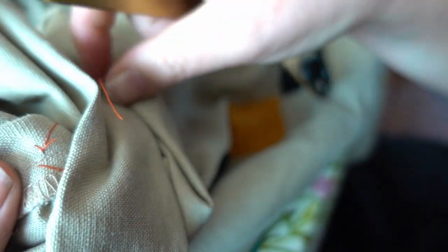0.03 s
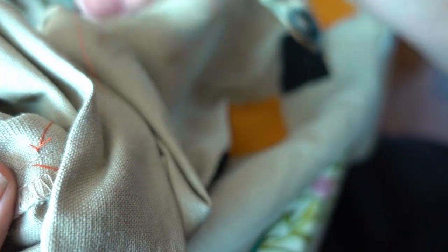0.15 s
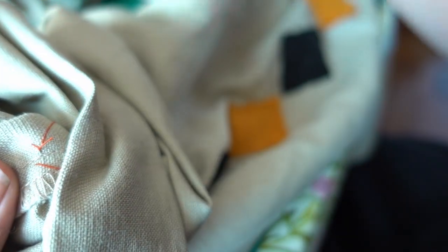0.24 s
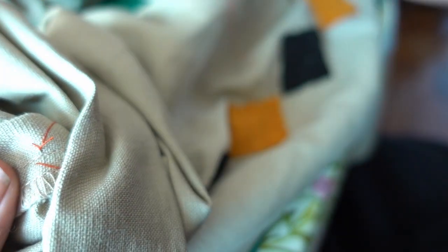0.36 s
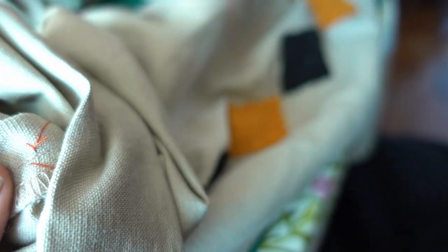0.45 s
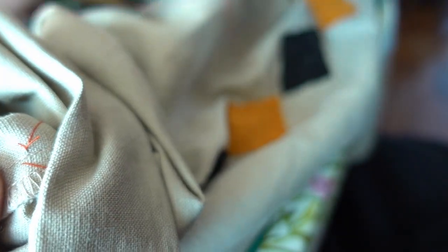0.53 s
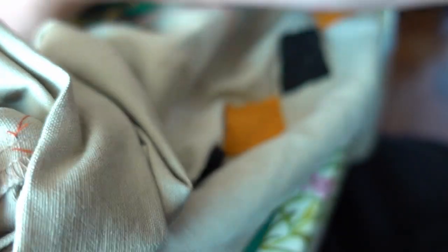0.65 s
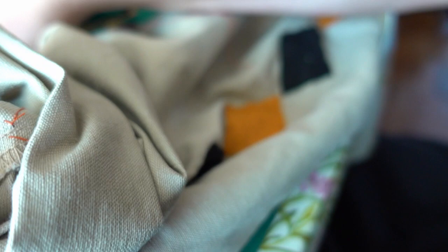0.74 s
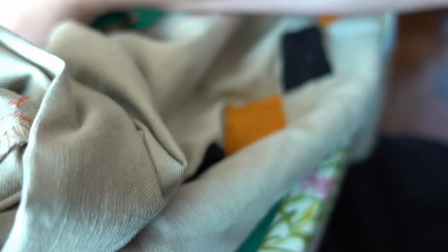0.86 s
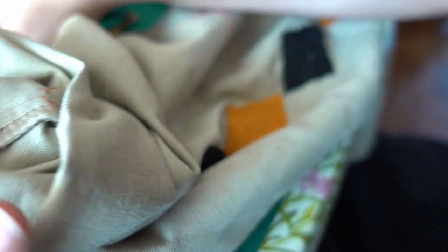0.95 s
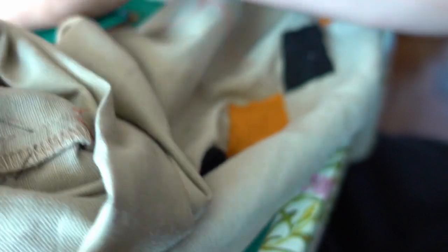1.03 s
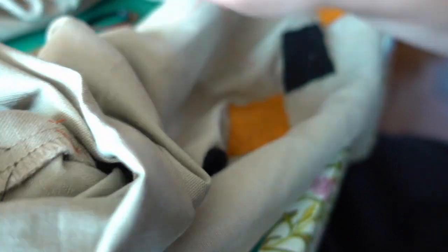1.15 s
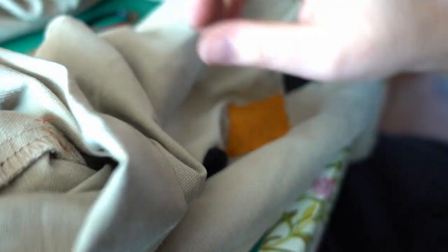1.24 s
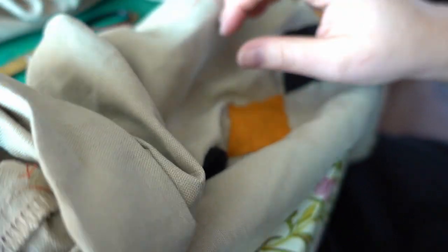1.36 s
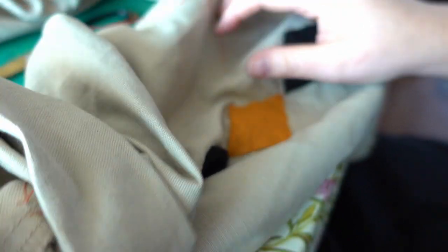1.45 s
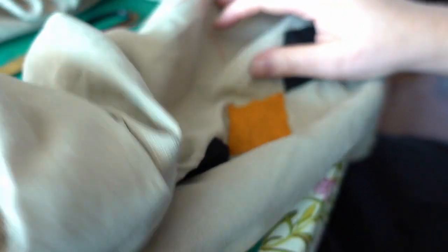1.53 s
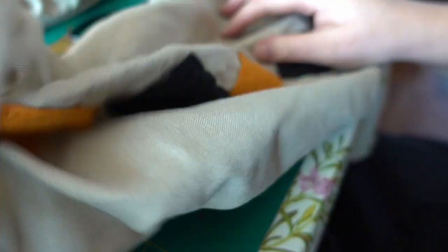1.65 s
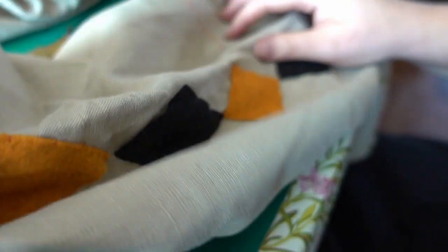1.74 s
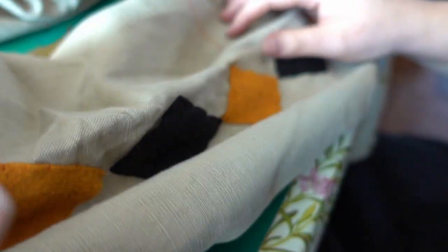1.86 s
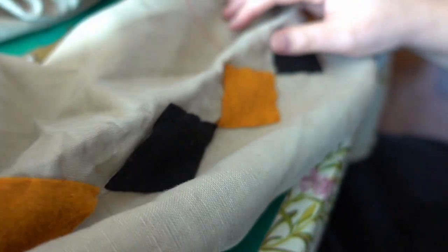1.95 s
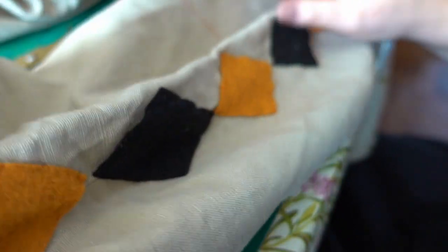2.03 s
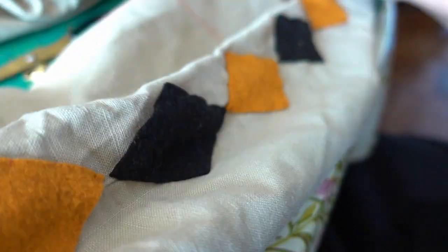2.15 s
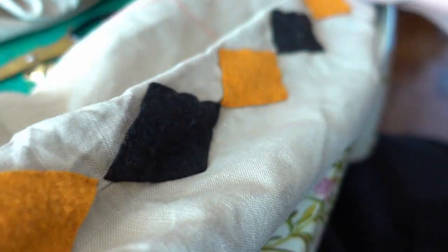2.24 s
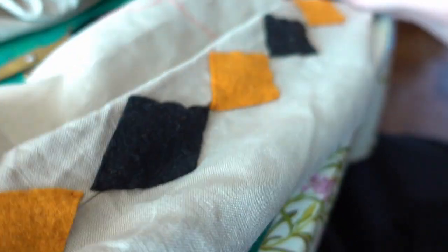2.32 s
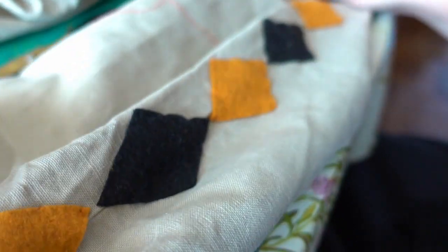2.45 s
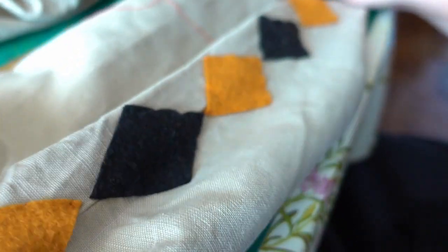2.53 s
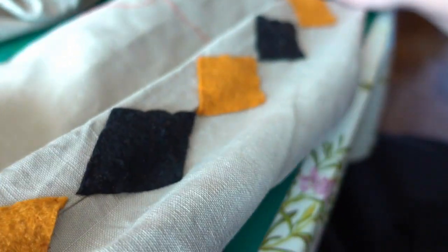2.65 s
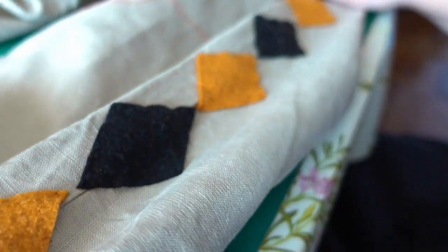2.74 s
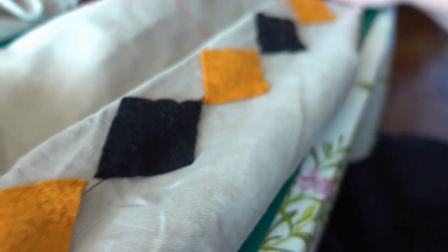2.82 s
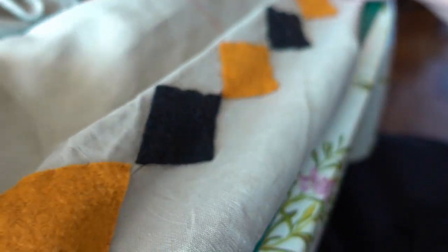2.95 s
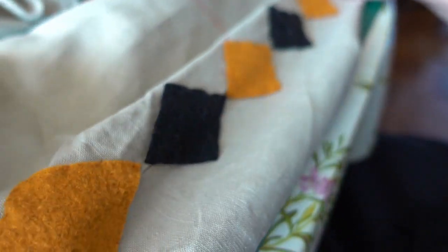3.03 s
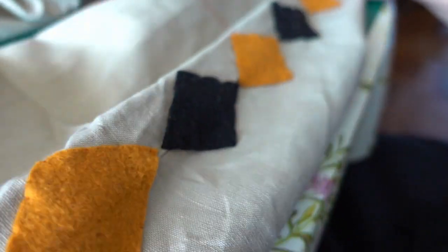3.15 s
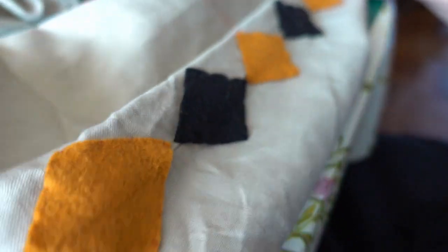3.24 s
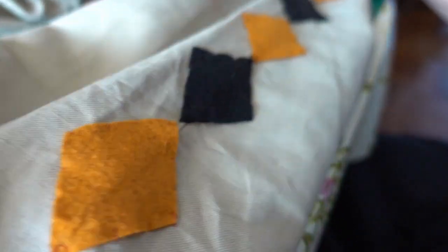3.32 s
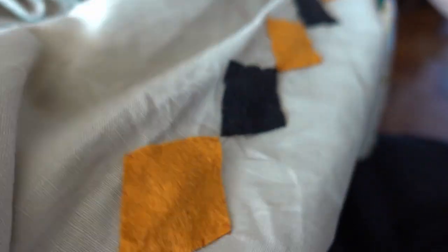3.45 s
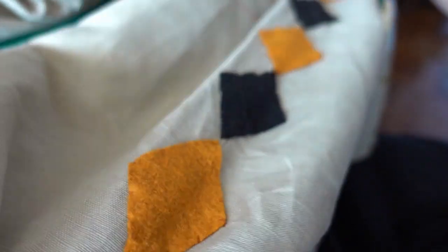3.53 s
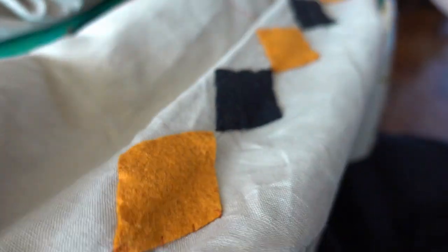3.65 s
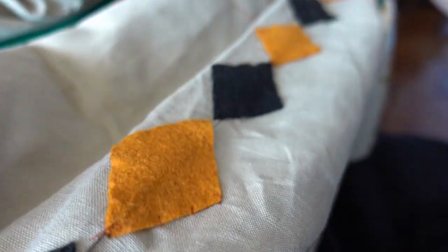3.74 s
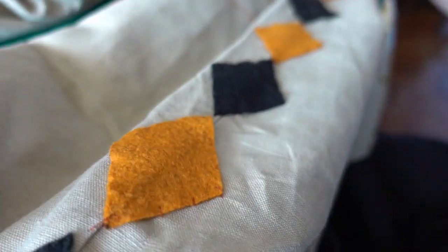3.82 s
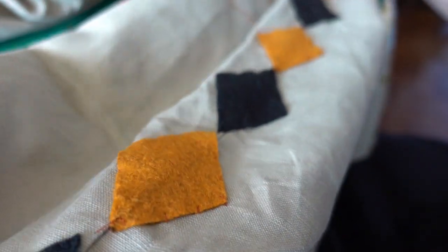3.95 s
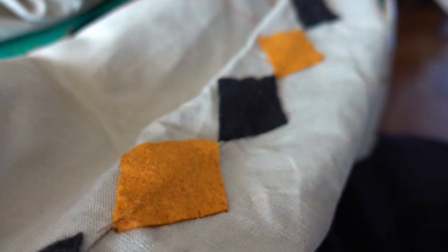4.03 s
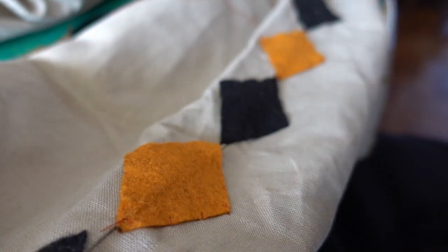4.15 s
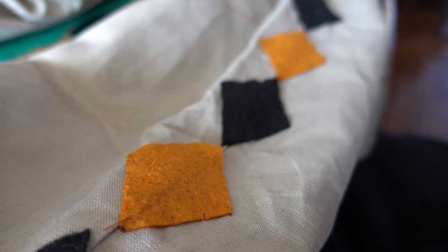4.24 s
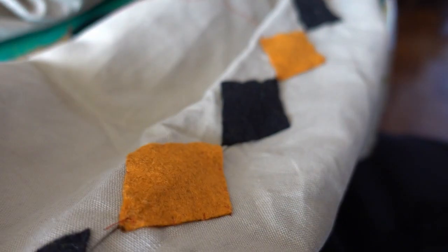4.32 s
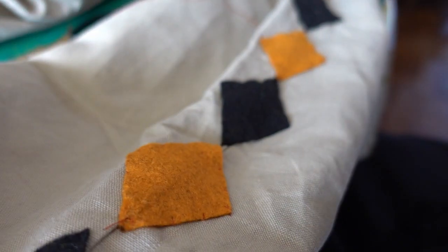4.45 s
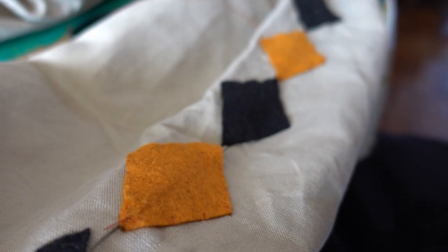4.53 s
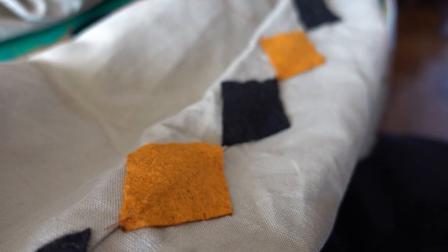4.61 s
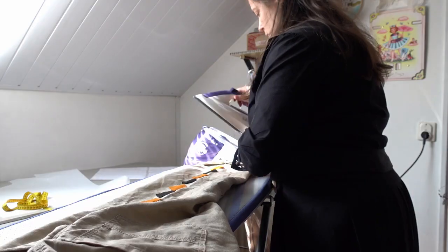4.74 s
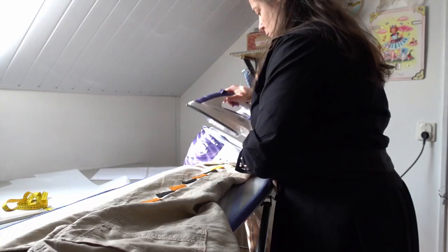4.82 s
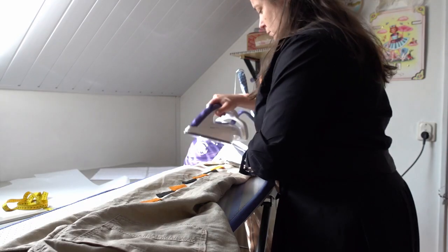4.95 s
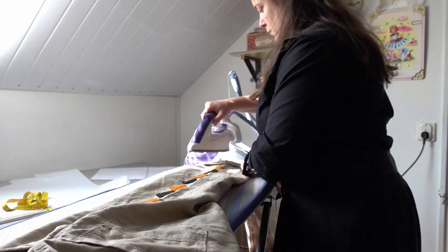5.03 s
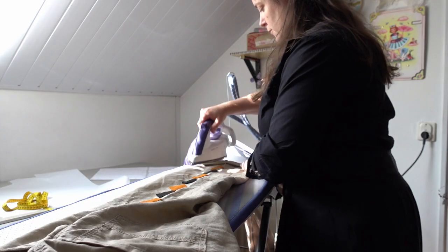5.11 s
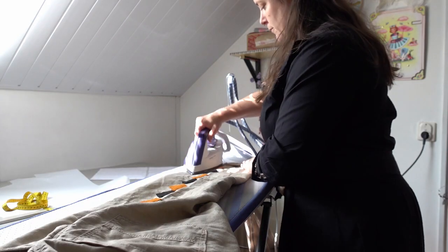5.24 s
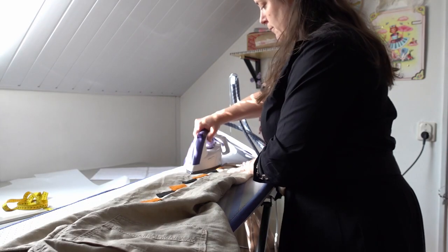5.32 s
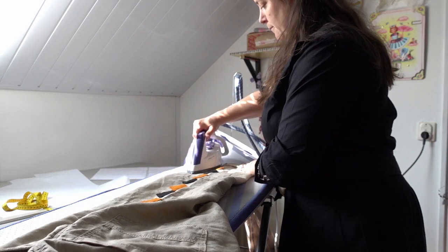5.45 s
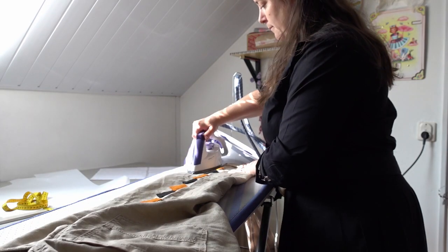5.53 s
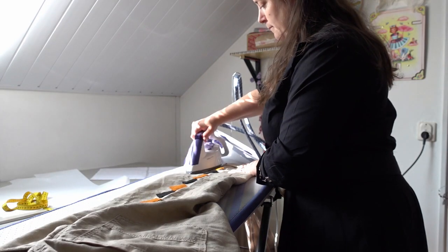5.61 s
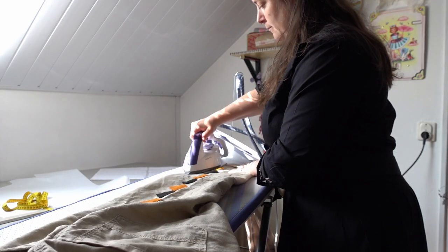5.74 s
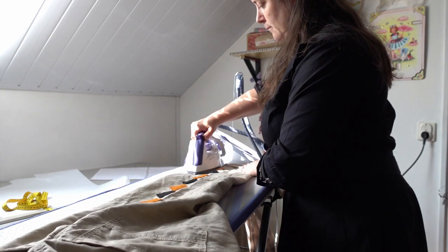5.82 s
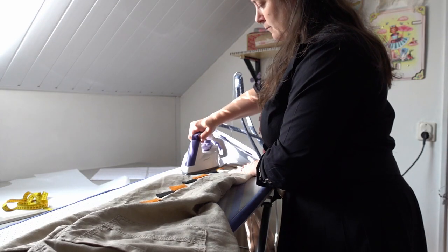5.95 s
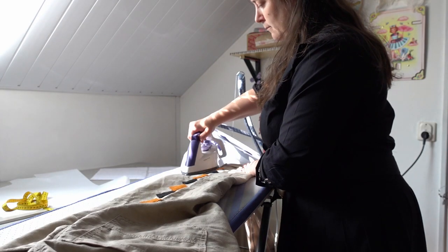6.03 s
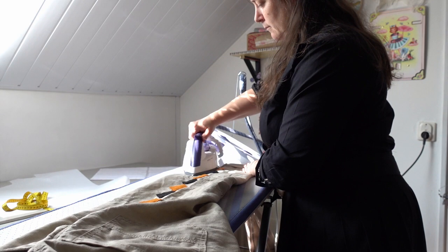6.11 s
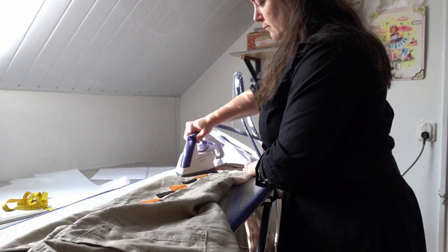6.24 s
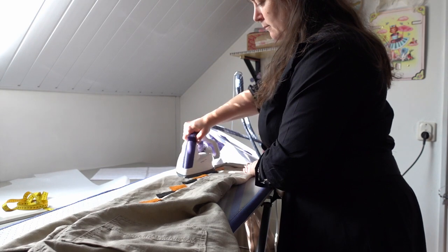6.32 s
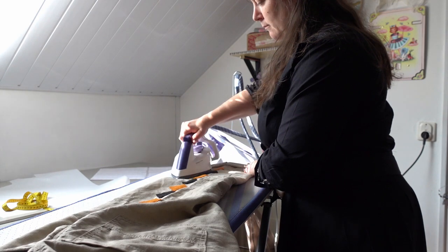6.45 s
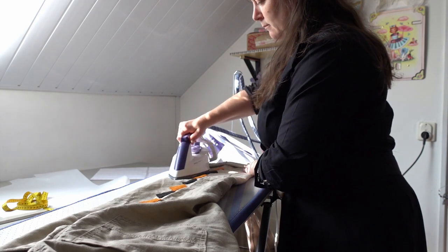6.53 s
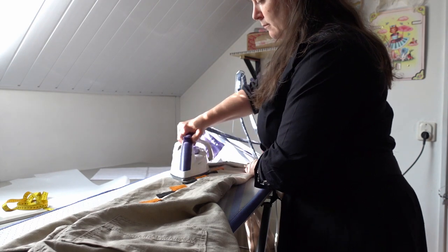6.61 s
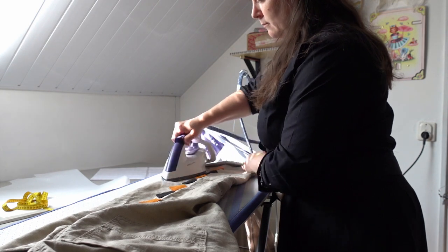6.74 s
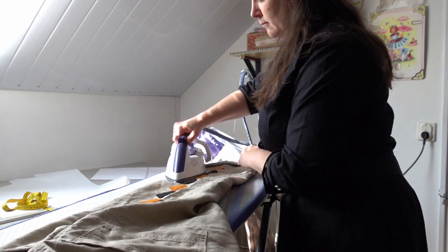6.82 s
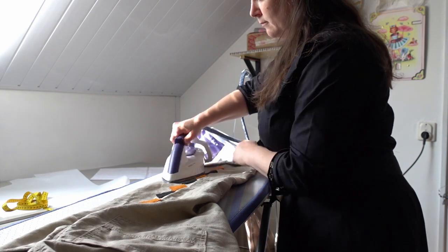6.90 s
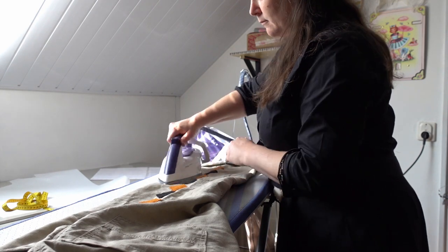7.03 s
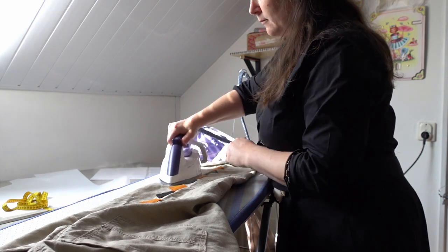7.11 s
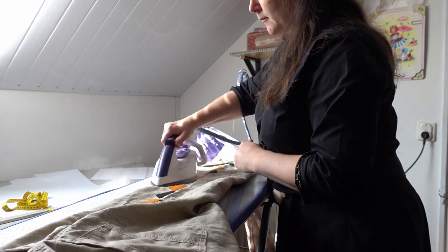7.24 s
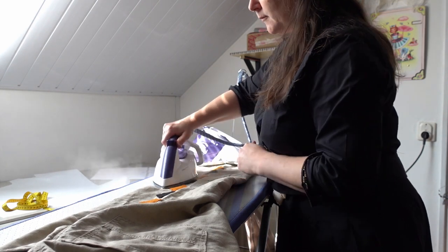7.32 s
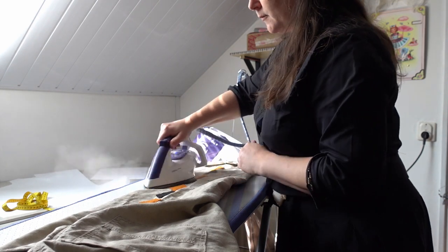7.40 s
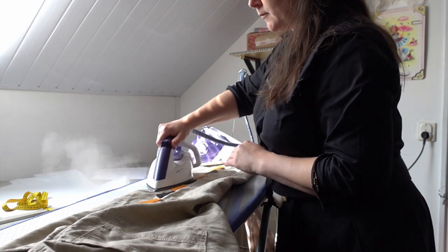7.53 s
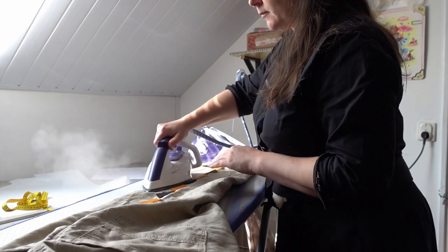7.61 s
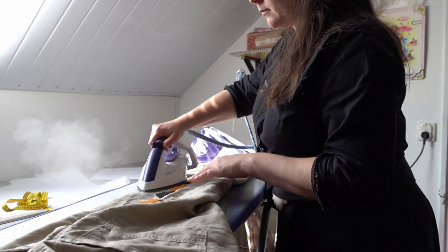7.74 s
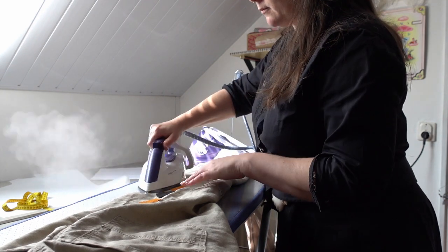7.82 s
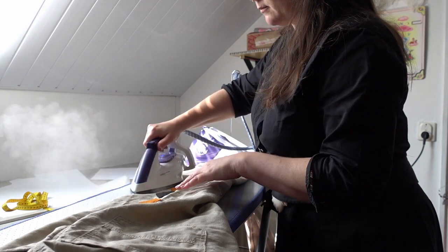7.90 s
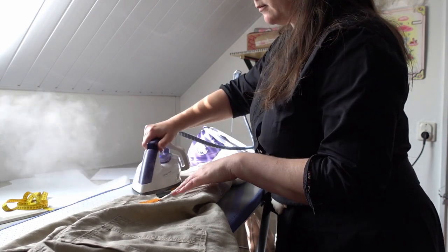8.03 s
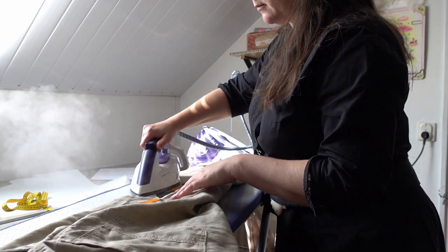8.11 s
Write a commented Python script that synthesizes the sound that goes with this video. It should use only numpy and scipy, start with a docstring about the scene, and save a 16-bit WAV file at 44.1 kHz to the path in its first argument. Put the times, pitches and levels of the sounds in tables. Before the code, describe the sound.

Hands softly swish and crumple cloth on an ironing board. Near the start a small tool drops and bounces with sharp knocks. The rustling goes on with light taps, then a steam iron lands with a dull thud and its trigger clicks. Steam spits, hisses and swells into loud surges over a low boiler rumble. The sounds are fairly close, in a small quiet room.

```python
"""A steam iron roars in surges over a thin hiss and a rumbling boiler, in a small attic room.
First, hands swish and crumple cloth over the ironing board, and a dropped tool cracks and bounces,
setting the board ringing. The iron thuds onto the padding, its trigger clicks and the valve opens.
The jet spits and gurgles, rings in the gap under the sole, and brightens and whistles as it surges."""
import sys
import numpy as np
from scipy import signal
from scipy.fft import rfft, irfft
from scipy.io import wavfile
from scipy.ndimage import uniform_filter1d

SR = 44100
rng = np.random.default_rng(int(sys.argv[2]) if len(sys.argv) > 2 else 0)


def pcm_store(signal):
    """Save signal as 16-bit PCM."""
    levels = np.round(np.clip(np.atleast_2d(signal), -1, 1) * 32767)
    wavfile.write(sys.argv[1], SR, levels.astype(np.int16).T)


N = 360297

# Noise colours. Each row: frequency in Hz, relative level in dB.
ROOM_COLOUR = [(25, -18), (55, -30), (92, -4.5), (180, -2.5), (212, -2), (463, -10), (988, -12.5),
               (1370, -13.5), (2840, -14.5), (4250, -20), (9320, -25), (16000, -25)]
CLOSE_HISS_COLOUR = [(1600, -26), (2250, 5), (3000, -24)]
RUMBLE_COLOUR = [(20, -35), (35, -5), (55, 2.5), (85, 2), (130, -25.5)]
SLIDE_COLOUR = [(880, -32), (1500, -18), (2640, -3), (3620, 2.5), (11300, -1), (16000, -6.5)]
CRUMPLE_COLOUR = [(250, -19), (450, -11), (700, -13), (1050, -3.5), (1600, -9.5), (2300, -7), (3000, -11),
                  (6000, -17.5), (9000, -29.5)]
PUSH_COLOUR = [(53, -36), (90, -9), (259, -6), (454, -7.5), (780, -13), (1320, -120)]
BRUSH_COLOUR = [(1400, -13), (2100, -3), (2600, 2), (3500, -6), (4300, -18), (16000, -28)]
BOARD_COLOUR = [(18, -66), (30, -19.5), (204, -6), (266, -10), (336, -5), (554, -7.5), (780, -11),
                (1250, -7.5), (1810, -12), (3770, -22), (4910, -26.5), (8740, -29), (12000, -26),
                (16000, -30)]
PAD_COLOUR = [(35, -61), (60, -27), (106, -30), (160, 4.5), (296, 8.5), (632, 3.5), (775, 0), (1010, -5.5),
              (4420, -29.5), (10400, -80)]  # the board's padded top
SHELL_COLOUR = [(200, -32), (519, 1), (590, -14), (1210, -12.5), (1680, -5.5), (2470, -12), (3020, -6),
                (3490, -13), (4200, -11.5), (5730, -16), (12800, -14.5), (16000, -23)]  # the iron's plastic body
JET_FLAT_COLOUR = [(250, -43), (400, -17), (550, -12), (900, -3.5), (1250, -3.5), (2000, -2), (2800, -4.5),
                   (4300, -13), (6500, -18), (9000, -42)]  # sole flat on the cloth
JET_TURNED_COLOUR = [(250, -53), (400, -11.5), (550, -8.5), (900, -5), (1250, -7.5), (2000, -4.5),
                     (2800, -4.5), (3700, -10), (6500, -23.5), (9000, -54)]  # iron turned at the end of the stroke
WHISTLE_COLOUR = [(12000, -40), (12700, -6), (13400, 0), (14000, -6), (14800, -40)]
VENT_HISS_COLOUR = [(2000, -18.5), (3600, -2.5), (6600, -7.5), (8500, -2.5), (10300, 2), (12300, 1.5),
                    (13500, 1.5), (16000, -1)]
BOILER_COLOUR = [(59, -58), (100, -30), (226, 3.5), (324, 3), (366, -7), (600, -14), (780, -5.5),
                 (1320, -120)]

# Stereo width. Each row: frequency in Hz, left-right likeness (1 is mono).
WIDE_IMAGE = [(60, 0.98), (180, 0.95), (550, 0.73), (1650, 0.39), (4970, -0.043), (15000, -0.1)]
STRUCK_IMAGE = [(60, 1.0), (180, 1.0), (550, 0.98), (1650, 0.81), (4970, -0.21), (15000, 0.18)]
NEAR_IMAGE = [(60, 1), (250, .997), (640, .97), (1400, .92), (3100, .8), (6000, .45), (9000, .6),
              (15000, .65)]
# Balance of all the noise. Each row: frequency in Hz, left minus right in dB.
NOISE_PAN = [(60, 0), (300, 0), (900, 1.2), (4500, .8), (15000, -2)]
# Added balance of the hands. Each row: time in seconds, left minus right in dB.
HANDS_PAN = [(0, -5), (.45, -5), (.8, 0), (8.17, -2.5)]
# The steam reaches the left first. Each row: frequency in Hz, phase lead in radians.
STEAM_LEAD = [(60, 0), (2000, -.05), (3400, .4), (7500, .7), (9000, 1.9), (12000, 2.5), (16000, 2.6)]

# Fader moves. Each row: time in seconds, level in dB.
CLOSE_HISS_FADER = [(0, -61), (.3, -65), (.6, -67), (4.71, -70)]
RUMBLE_FADER = [(0.0, -71), (1.3, -65), (3.57, -63.5), (4.39, -73), (5.78, -71), (6.1, -73), (7.12, -57.5),
                (8.17, -77)]
BRUSH_FADER = [(4.775, -75), (4.8, -59), (5.05, -62), (5.2, -73)]
VENT_HISS_FADER = [(5.858, -20), (5.872, -36.5), (5.92, -41.5), (6.3, -38.5), (6.8, -35.5), (7.4, -35),
                   (8.17, -33.5)]
# Hand strokes. Each row: middle and length in seconds, then slide, crumple and push levels in dB.
HAND_STROKES = [(0.076, 0.11, -62, -59.5, -61), (0.343, 0.51, -59, -56.5, -78),
                (1.208, 0.29, -55, -50, -52.5), (1.533, 0.26, -54, -54, -58),
                (1.718, 0.27, -51.5, -51.5, -52.5), (2.068, 0.33, -55.5, -54.5, -53),
                (2.358, 0.25, -57, -54.5, -56), (2.57, 0.31, -57, -55.5, -55),
                (2.906, 0.29, -47.5, -55, -55.5), (3.14, 0.24, -58, -54, -57),
                (3.343, 0.21, -49.5, -54, -55), (3.468, 0.23, -49, -53, -54),
                (3.745, 0.32, -61, -61, -56.5), (4.444, 0.22, -64, -64, -87), (5.03, 0.44, -59, -67, -60)]
# Bumps that shake the board. Each row: peak time in seconds, level in dB.
BOARD_BUMPS = [(1.04, -43), (2.34, -49), (2.82, -53)]

# Hits. Each row: start in seconds, crack peak in dB, tilt in dB per octave,
# ring against the crack in dB, ring time multiplier, knock pitch in Hz.
BOARD_TICKS = [(.428, -36.5, -3, -38, .4, 940), (.498, -31, -1, -28, 1, 2190),
               (1.46, -25.5, 1.5, -20, 0.14, 2300), (3.466, -32.5, 0.5, -14, 0.23, 1010),
               (3.842, -43, -6, -30, 0.22, 900)]
TOOL_BOUNCES = [(.7305, -10.5, -3.5, -18, 0.66, 1790), (.749, -22.5, 1, -16.5, 2.8, 420),
                (.8315, -17.5, -6, -19.5, 0.5, 483), (.8605, -21, -0.5, -18.5, 1.06, 1240),
                (.886, -25.5, -8, -17, 2.5, 900), (.9882, -6.5, 0, -16.5, 0.62, 1480),
                (.9972, -12, 13, -13.5, 1.23, 392), (1.0318, -7.5, -3, -19, 1.23, 1120)]
PAD_THUDS = [(1.368, -42, 2, -10, 0.28, 410), (2.33, -35.5, -26, -15.5, 0.99, 150),
             (2.565, -39, 4, -6.5, 0.38, 990), (3.995, -38.5, 5.5, -14.5, 1, 455),
             (4.787, -38, 0, -9, 0.75, 295), (4.965, -38, -12, -3.5, 0.35, 354),
             (5.199, -29.5, 3, -5, 0.73, 330)]
TRIGGER_CLICKS = [(5.561, -45.5, 3, 3, 0.43, 10200), (5.563, -41, -8, -2.5, 0.38, 2900),
                  (5.579, -44, -6, 0, 0.64, 468), (5.7623, -17, -4, -14.5, 0.65, 1590),
                  (5.866, -36, -4, -10, 3.9, 1110)]
# Noisy tail of every hit. Each row: frequency in Hz, base time to fall 60 dB in seconds.
TAIL_DECAY = [(60, 0.77), (160, 0.9), (420, 0.57), (1100, 0.44), (2910, 0.48), (7680, 0.28)]
# Body modes. Each row: pitch in Hz, relative level in dB, base time to fall 60 dB in seconds.
BOARD_TONES = [(222.8, 0.5, 0.45), (325.4, 11, 0.22), (433, 0, 0.23), (524, 7, 0.1), (935, -7, 0.38),
               (1790, -12, 0.12), (2397, 2, 0.13)]
PAD_TONES = [(192.3, 5.5, 0.6), (281.4, 3.5, 0.45)]
SHELL_TONES = [(480, -10, 0.35), (1117, -3, 0.1), (1350, -1, .05), (1728, -7, 0.12), (1981, -6, 0.1),
               (3063, -3, 0.1), (3784, 2, .045), (4247, 5, 0.04)]

# Steam between surges. Each row: time in seconds, jet level in dB, boiler level in dB.
STEAM_FLOW = [(5.856, -54, -63), (5.875, -44, -46.5), (6.23, -42, -41.5), (6.4, -43, -40),
              (6.6, -41.5, -43), (6.77, -34.5, -52), (6.93, -32, -52), (7.15, -29.5, -44),
              (7.38, -32, -44.5), (8.17, -36.5, -48.5)]
# Spits of water. Each row: peak time in seconds, jet level in dB, boiler level in dB.
WATER_SPITS = [(5.872, -37, -37), (6.4, -32.5, -40)]
# Surges. Each row: peak time in seconds, jet level in dB, added tilt in dB per octave.
JET_SURGES = [(6.58, -36, -3), (7.06, -21, 0), (7.277, -21.5, -1.5), (7.498, -23, 0.1), (7.753, -25, 0.9),
              (8.02, -24, 0.3)]
# Water in the jet. Each row: time in seconds, depth of the flutter in dB.
GURGLE_DEPTH = [(5.85, .8), (6.45, 1), (6.64, 3), (6.72, 1.2), (8.17, .6)]
# The iron's turn. Each row: time in seconds, share of the turned colour.
IRON_TURN = [(7.3, 0.073), (7.7, 0.96)]
# Hollow gap between sole and cloth. Each row: time in seconds, four resonances in Hz, base lift in dB.
SOLE_GAP = [(6.3, 850, 1500, 2200, 3600, 2), (6.6, 1080, 1700, 2500, 3900, 7),
            (7.1, 996, 1650, 2560, 4180, 8), (7.24, 1250, 1720, 2700, 4210, 8),
            (7.5, 1200, 1750, 2550, 3290, 8), (7.75, 1190, 1900, 2700, 3210, 7),
            (8.02, 1170, 1950, 2420, 3200, 7)]
# The cold steam channel, ringing until it fills. Each row: resonance in Hz, starting lift in dB.
CHANNEL_RINGS = [(1117, 14), (1950, 14), (2900, 16), (4300, 13), (5500, 12)]
# Narrow, steady room resonances ringing in the jet's roar. Each row: pitch in Hz, relative level in dB.
ROOM_RINGS = [(555.5, -47), (2930, -48), (1855, -48.5), (2207, -51)]

STEAM_START_S, VALVE_OPENS_S = 5.8, 5.861
STEAM_START = round(STEAM_START_S * SR)
TIME = np.arange(N) / SR


def gain_of(db):
    """Decibels to amplitude."""
    return 10 ** (np.asarray(db) / 20)


def summed_db(levels_db):
    """Level of several sounds heard together."""
    return 10 * np.log10(sum(10 ** (level / 10) for level in levels_db))


def unit_rms(x):
    """Scales to rms 1."""
    return x / np.sqrt(np.mean(x ** 2) + 1e-20)


def at_hz(points, hz):
    """Reads a table on a log-frequency axis."""
    f, value = np.transpose(points)
    return np.interp(np.log(hz + 1), np.log(f + 1), value)


def fader(rows, column=1):
    """One column of a table at every sample, silent outside its span."""
    return np.interp(TIME, *np.transpose(rows)[[0, column]], left=-120, right=-120)


def bell(offset, width):
    """A resonance peak of height 1; width spans its half-height points."""
    return 1 / (1 + (2 * offset / width) ** 2)


def humps(rows, column, rise_db_per_s, fall_db_per_s):
    """Level in dB that climbs to each event's peak and sinks after it, at steady rates."""
    t = np.arange(0, N / SR, .001)
    each = [row[column] - np.maximum(rise_db_per_s * (row[0] - t), fall_db_per_s * (t - row[0]))
            for row in rows]
    return np.interp(TIME, t, summed_db(np.maximum(each, -140)))


def noise(shape_db, image, size, length=N, patchy_db=0, flicker_db=0, echoes_db=0, lead=None):
    """Stereo noise of rms 1 from random short-time spectra; shape_db(hz, s) gives its colour."""
    hop = size // 4
    frames, hz = length // hop + 5, np.fft.rfftfreq(size, 1 / SR)[:, None]
    a, b, c, d, grain = rng.standard_normal((frames, len(hz), 5), dtype=np.float32).T
    flicker = unit_rms(uniform_filter1d(grain, len(hz) // 3, axis=0))  # short gusts across wide bands
    patches = unit_rms(uniform_filter1d(uniform_filter1d(grain, 6, axis=0), 10, axis=1))
    ripple = np.tanh(rng.standard_normal(hz.shape))  # wall echoes leave a fine, still comb
    likeness = np.clip(at_hz(image, hz), -1, 1)
    left = a + 1j * b
    right = likeness * left + np.sqrt(1 - likeness ** 2) * (c + 1j * d)
    lag = 0 if lead is None else at_hz(lead, hz)
    spectra = np.array([left, right * np.exp(-1j * lag) / gain_of(at_hz(NOISE_PAN, hz))])
    texture_db = patchy_db * patches + flicker_db * flicker + echoes_db * ripple
    spectra *= gain_of(shape_db(hz, np.arange(frames) * hop / SR) + texture_db)
    return unit_rms(signal.istft(spectra, nperseg=size, noverlap=size - hop)[1][:, :length])


def layer(colour, level_db, image, size, **texture):
    """Noise of one colour riding a level curve."""
    return gain_of(level_db) * noise(lambda hz, s: at_hz(colour, hz), image, size, len(level_db), **texture)


def room_tone():
    """Quiet air, a slow rumble through floor and board, and a narrow hiss that fades away."""
    air = layer(ROOM_COLOUR, np.full(N, -59.5), WIDE_IMAGE, 2048, patchy_db=2.2, echoes_db=3)
    rumble = layer(RUMBLE_COLOUR, fader(RUMBLE_FADER), NEAR_IMAGE, 4096)
    hiss = layer(CLOSE_HISS_COLOUR, fader(CLOSE_HISS_FADER), WIDE_IMAGE, 2048, patchy_db=2)
    return air + rumble + hiss


def strokes(column, rest_db):
    """Level in dB of one cloth sound: it swells with each stroke, over the cloth settling at rest_db."""
    t = np.arange(0, N / SR, .005)
    ends_db, roundness = -10, 1.84
    swells = [row[column] + ends_db * (2 * abs(t - row[0]) / row[1]) ** roundness for row in HAND_STROKES]
    return np.interp(TIME, t, summed_db(swells + [rest_db]))


def crackles(per_s=45, level_db=-10, spread_db=3, rise_s=.004):
    """Gain of the crumpling: folds of cloth give way at random in short bursts."""
    strength = gain_of(level_db + spread_db * np.minimum(rng.exponential(1, N), 3))
    snaps = strength * (rng.random(N) < per_s / SR)
    age = np.arange(2000) / SR / rise_s
    return 1 + abs(signal.oaconvolve(snaps, np.e * age * np.exp(-age))[:N])


def hands():
    """Cloth swishes, crumples and presses the board; sleeve and cord brush by as the iron is lowered."""
    slide = layer(SLIDE_COLOUR, strokes(2, rest_db=-68), WIDE_IMAGE, 512, patchy_db=.8, flicker_db=.7)
    crumple = layer(CRUMPLE_COLOUR, strokes(3, rest_db=-68.5), WIDE_IMAGE, 256,
                    patchy_db=1.8, flicker_db=1.5)
    push = layer(PUSH_COLOUR, strokes(4, rest_db=-75.5), WIDE_IMAGE, 2048, patchy_db=2, flicker_db=2.5)
    brush = layer(BRUSH_COLOUR, fader(BRUSH_FADER), WIDE_IMAGE, 512, patchy_db=2, flicker_db=1)
    pan_db = np.interp(TIME, *np.transpose(HANDS_PAN))
    return (slide + crumple * crackles() + push + brush) * gain_of([pan_db / 2, -pan_db / 2])


def pulse(tone_db):
    """The sharpest causal pulse with the given spectrum."""
    log_gain = np.log(gain_of(np.maximum(tone_db - tone_db.max(), -80)))
    mirrored = np.concatenate([log_gain, log_gain[-2:0:-1]])
    return np.fft.ifft(np.exp(np.conj(signal.hilbert(mirrored)))).real


def hits(rows, colour, modes, modes_db, crack_s, rise_s, low_cut_hz, length, knock_share=.33):
    """Each hit is a short crack; then body and room ring on, every band dying at its own speed."""
    out, t = np.zeros((2, N)), np.arange(length) / SR
    age = t[:2048] / crack_s
    crack_hz, ring_hz = np.fft.rfftfreq(len(age), 1 / SR), np.fft.rfftfreq(length, 1 / SR)
    low_cut_db = 20 * np.log10(1 + (low_cut_hz / (crack_hz + 1)) ** 2)  # the bass needs time to build
    for start_s, peak_db, tilt, ring_db, sustain, knock_hz in rows:
        knock_db = lambda hz: 14.9 * bell(np.log2(hz / knock_hz + 1e-3), width=.22)
        tone_db = lambda hz, s: at_hz(colour, hz) + tilt * np.log2(hz / 1000 + .054) + knock_db(hz)
        snap = unit_rms(pulse(tone_db(crack_hz, 0) - low_cut_db))
        rattle = unit_rms(noise(tone_db, STRUCK_IMAGE, 1024, len(age)) * age * np.exp(-age))
        crack = snap * np.exp(-age / 8.9) + .97 * rattle
        decay_db = lambda hz, s: -60 * s / np.maximum(sustain * at_hz(TAIL_DECAY, hz), .01)
        tail = noise(decay_db, STRUCK_IMAGE, 256, length, flicker_db=1.2)
        ring = irfft(gain_of(at_hz(colour, ring_hz) + knock_share * knock_db(ring_hz)) * rfft(tail))
        ring /= np.sqrt(np.mean(ring[:, :SR // 20] ** 2))
        for hz, db, t60 in modes:
            mode_db = modes_db + db + knock_db(hz) - 60 * t / (sustain * t60)
            ring += gain_of(mode_db) * np.sin(2 * np.pi * hz * t)
        hit = gain_of(peak_db + ring_db) * ring * (1 - np.exp(-t / rise_s)) * (1 - t / t[-1])
        hit[:, :len(age)] += gain_of(peak_db) * crack / abs(crack).max()
        slot = out[:, round(start_s * SR):][:, :length]
        slot += hit[:, :slot.shape[1]]
    return out


def board_ticks():
    """Light taps ring the board briefly."""
    return hits(BOARD_TICKS, BOARD_COLOUR, BOARD_TONES, modes_db=-7,
                crack_s=.00078, rise_s=.0051, low_cut_hz=600, length=4096)


def dropped_tool():
    """A tool lands on the board and bounces in hard, ringing cracks."""
    return hits(TOOL_BOUNCES, BOARD_COLOUR, BOARD_TONES, modes_db=-9.5,
                crack_s=.00044, rise_s=.0073, low_cut_hz=497, length=10240)


def board_shake(hz=47.6):
    """Each bump shakes the board at one deep pitch."""
    level_db = humps(BOARD_BUMPS, 1, rise_db_per_s=200, fall_db_per_s=105)
    return gain_of(level_db) * np.sin(2 * np.pi * hz * TIME)


def pad_thuds():
    """The padded top takes soft knocks, and at last the iron, with a dull thud."""
    return hits(PAD_THUDS, PAD_COLOUR, PAD_TONES, modes_db=-6.5,
                crack_s=.0022, rise_s=.014, low_cut_hz=150, length=8192)


def trigger():
    """The trigger's clicks ring the iron's plastic shell."""
    return hits(TRIGGER_CLICKS, SHELL_COLOUR, SHELL_TONES, modes_db=-2,
                crack_s=.00075, rise_s=.0041, low_cut_hz=800, length=8192, knock_share=.78)


def jet_colour(hz, s, flow_db):
    """The jet brightens with flow and shifts as the iron turns; gap, channel and room ring in it."""
    now = s + STEAM_START_S
    surge_s, _, surge_tilt = np.transpose(JET_SURGES)
    flow_now_db = np.interp(now, TIME[STEAM_START:], np.maximum(flow_db, -50))
    tilt = .78 + .35 * (flow_now_db + 19) + np.interp(now, surge_s, surge_tilt)  # dB per octave
    turned = np.interp(now, *np.transpose(IRON_TURN))
    colour = (1 - turned) * at_hz(JET_FLAT_COLOUR, hz) + turned * at_hz(JET_TURNED_COLOUR, hz)
    colour += tilt * np.log2(hz / 1500 + .72)
    gap_s, *columns = np.transpose(SOLE_GAP)
    *gap_hz, gap_db = (np.interp(now, gap_s, column) for column in columns)
    colour += gap_db * sum(share * bell(hz - f, width=230) for f, share in zip(gap_hz, (.9, .6, .8, 1)))
    empty = np.exp(-(np.maximum(now - VALVE_OPENS_S, 0) / .2) ** 2)  # wet steam fills the channel
    colour += empty * sum(db * bell(hz - f, width=110) for f, db in CHANNEL_RINGS)
    colour -= 10 * np.log10(np.mean(gain_of(2 * colour), axis=0))  # colour changes, power stays
    room_rings = sum(gain_of(db + 59) * bell(hz - f, width=5.3) for f, db in ROOM_RINGS)
    return colour + 20 * np.log10(1 + room_rings)


def gurgle(lump_s=.005):
    """Flutter in dB: lumps of water pass through the jet before it runs dry."""
    width = round(lump_s * SR)
    lumps = uniform_filter1d(uniform_filter1d(rng.standard_normal(N - STEAM_START), width), width)
    return np.maximum(fader(GURGLE_DEPTH)[STEAM_START:], 0) * unit_rms(lumps)


def surges(rise_s=.096, fall_s=.11, roundness=1.5):
    """Level in dB of the surges: each climbs its last 10 dB in rise_s and sinks 10 dB in fall_s."""
    t = np.arange(0, N / SR, .002)
    each = [db - 10 * np.maximum((s - t) / rise_s, (t - s) / fall_s) ** roundness
            for s, db, _ in JET_SURGES]
    return np.interp(TIME, t, summed_db(np.maximum(each, -140)))


def steam(opening_s=.008):
    """The valve opens: the jet spits and roars over hiss and boiler; hard surges whistle at a vent."""
    spits = lambda column: humps(WATER_SPITS, column, rise_db_per_s=540, fall_db_per_s=160)
    flow_db = summed_db([fader(STEAM_FLOW), surges()])[STEAM_START:]
    jet_db = summed_db([flow_db, spits(1)[STEAM_START:]])
    boiler_db = summed_db([fader(STEAM_FLOW, 2), spits(2)])[STEAM_START:]
    whistle_db = -38 + 2.6 * (flow_db + 21)  # the edge tone sets in steeply with jet speed
    jet = noise(lambda hz, s: jet_colour(hz, s, flow_db), NEAR_IMAGE, 2048, N - STEAM_START,
                patchy_db=1.5, flicker_db=.6, echoes_db=2.5, lead=STEAM_LEAD)
    whistle = layer(WHISTLE_COLOUR, whistle_db, NEAR_IMAGE, 512, patchy_db=4, lead=STEAM_LEAD)
    hiss = layer(VENT_HISS_COLOUR, fader(VENT_HISS_FADER)[STEAM_START:], NEAR_IMAGE, 2048,
                 patchy_db=1.2, flicker_db=1, echoes_db=6, lead=STEAM_LEAD)
    boiler = layer(BOILER_COLOUR, boiler_db, NEAR_IMAGE, 2048, patchy_db=.7, flicker_db=2)
    valve = np.clip((TIME[STEAM_START:] - VALVE_OPENS_S) / opening_s, 0, 1)
    mix = gain_of(jet_db + gurgle()) * jet + whistle + hiss + boiler
    return np.pad(valve * mix, ((0, 0), (STEAM_START, 0)))


def scene():
    """Room tone under the knocks, the cloth and the steam."""
    room = room_tone()
    knocks = dropped_tool() + board_shake() + pad_thuds() + board_ticks() + trigger()
    return room + knocks + hands() + steam()


def record(dry):
    """A steep low-pass trims the very top of the treble."""
    low_pass = signal.firwin(511, 15850, window=("kaiser", 9), fs=SR)
    return signal.oaconvolve(dry, low_pass[None], "same")


dry = scene()
out = record(dry)
pcm_store(out)
```